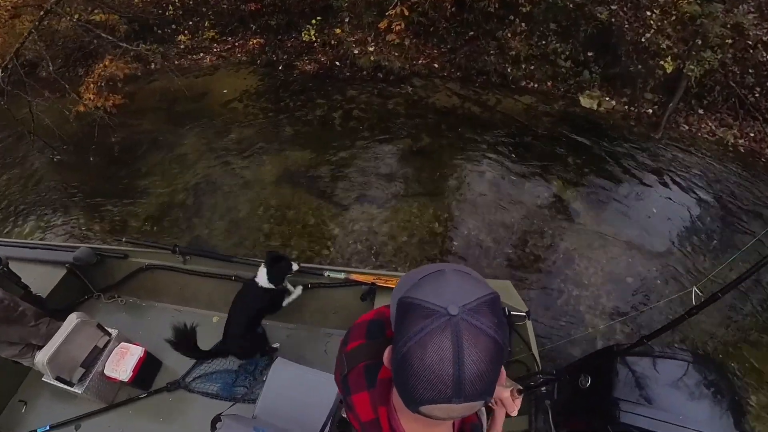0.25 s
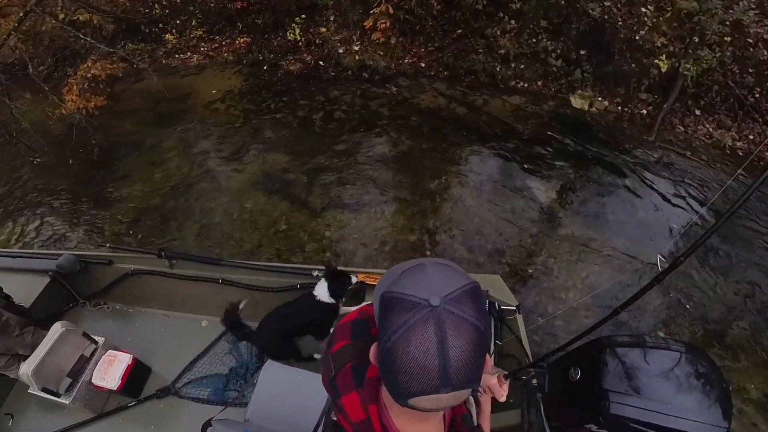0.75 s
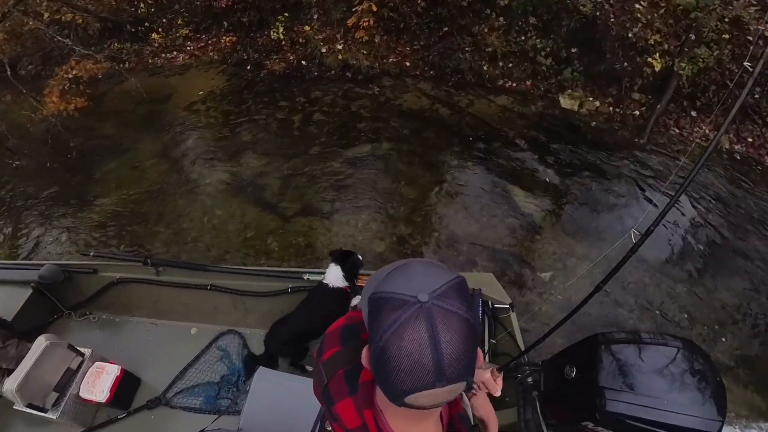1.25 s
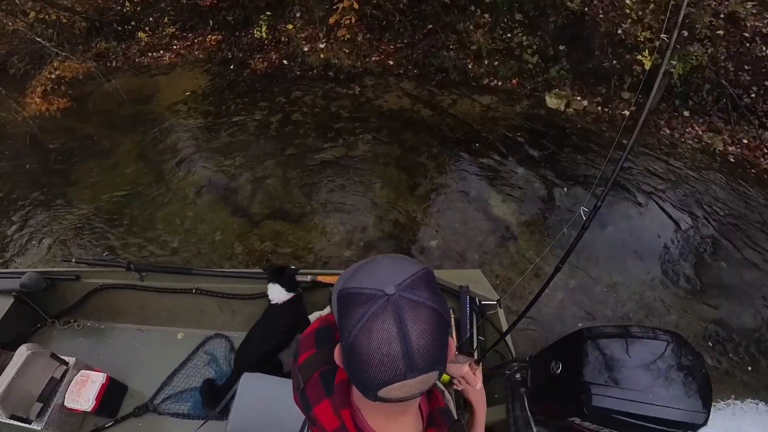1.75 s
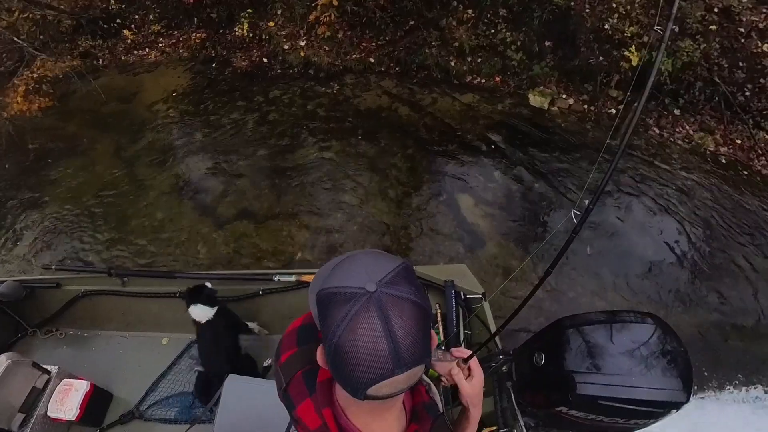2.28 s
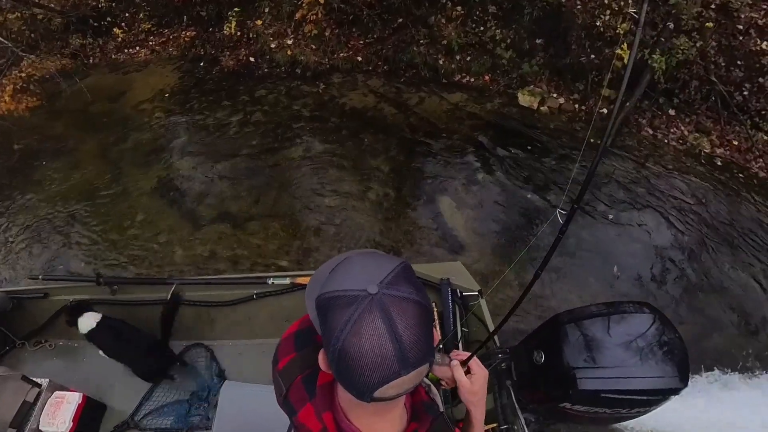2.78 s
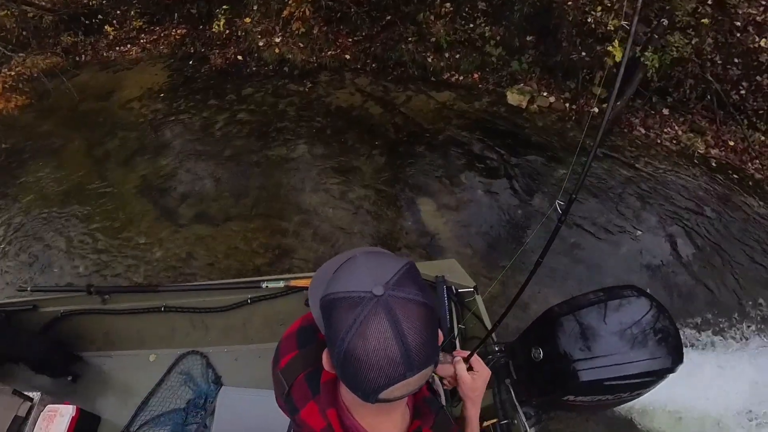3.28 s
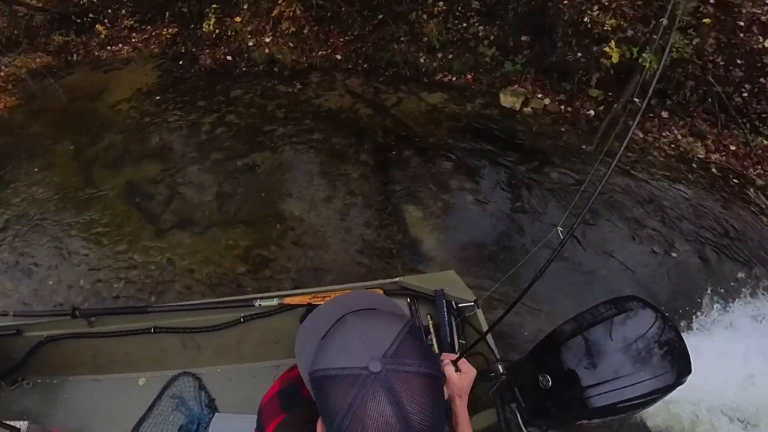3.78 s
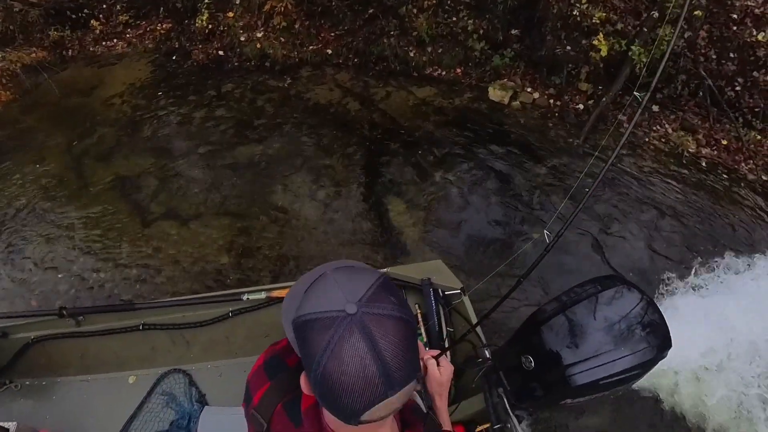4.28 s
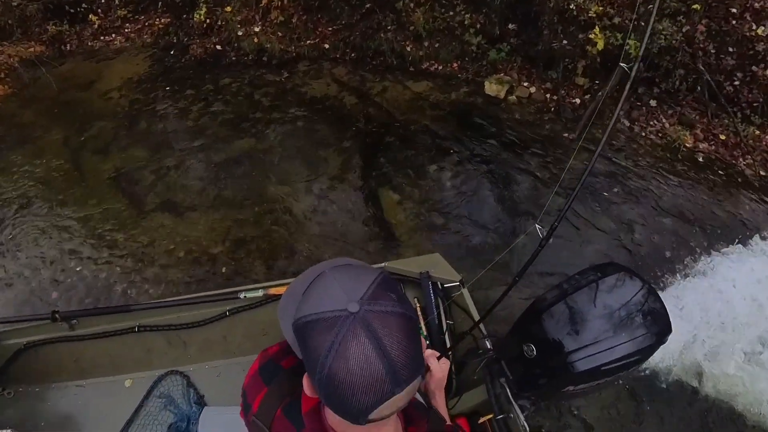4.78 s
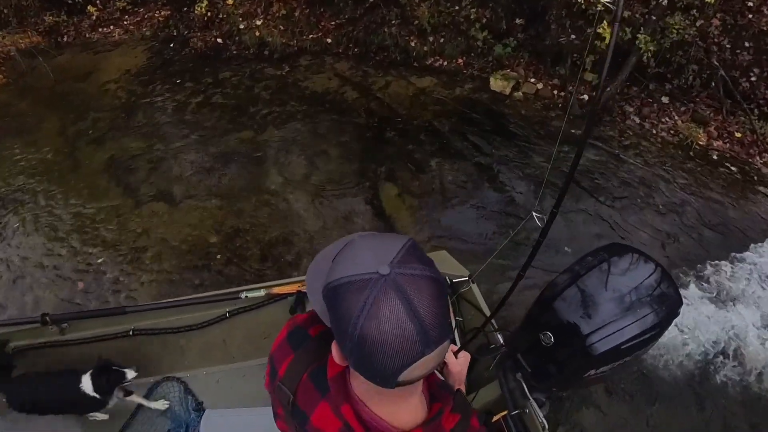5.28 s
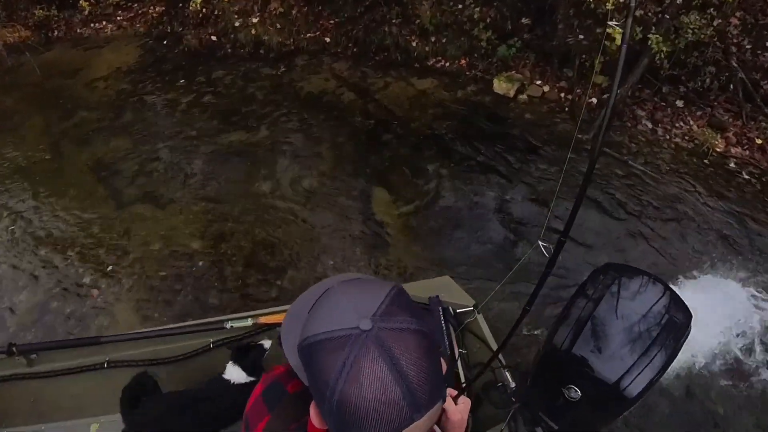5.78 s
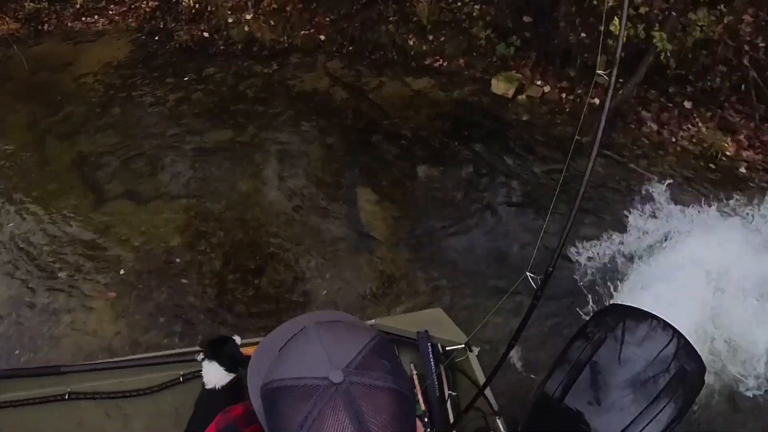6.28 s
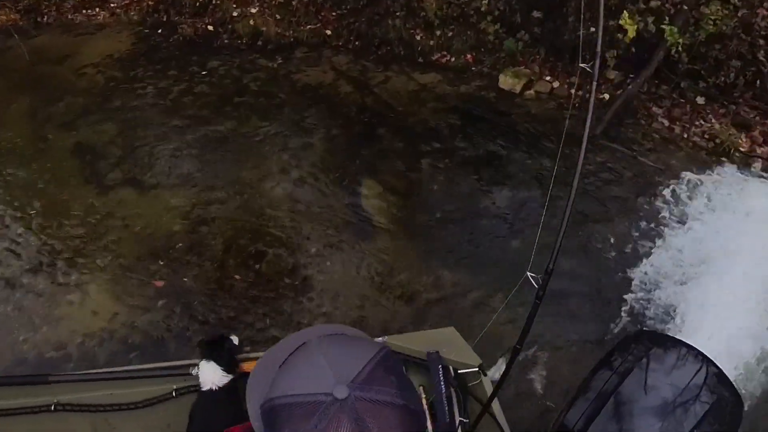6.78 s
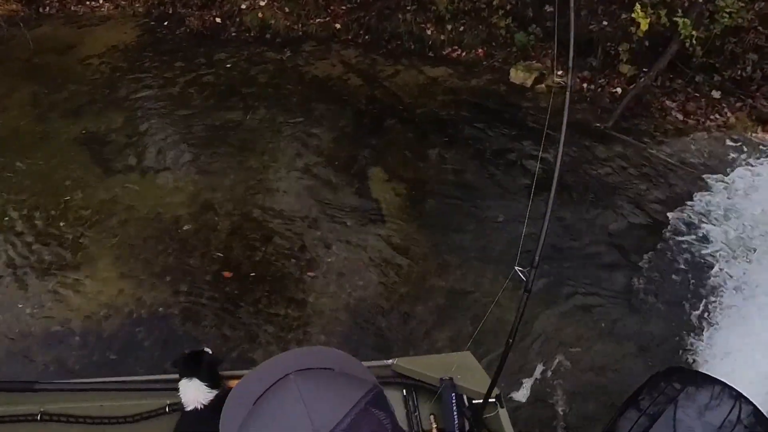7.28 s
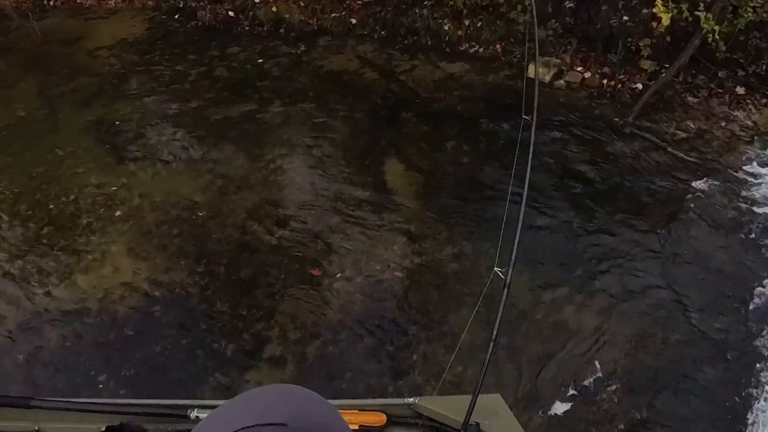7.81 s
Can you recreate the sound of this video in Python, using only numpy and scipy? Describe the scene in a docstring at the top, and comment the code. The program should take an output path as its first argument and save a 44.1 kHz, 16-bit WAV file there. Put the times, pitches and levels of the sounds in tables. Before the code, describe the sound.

An outboard motor dominates, deep and boomy, heard outdoors from aboard with no obvious echo. It idles with separate soft thumps, revs up and holds, falls abruptly to a burble with a swell of splashing wash, then quickly revs higher and stays there, buzzing. Underneath run bubbling exhaust water, fine airy spray spread left and right, and occasional light drop slaps.

```python
"""An outboard jet motor pushes a flat boat along a river, the throttle opened, closed and opened again.
Each firing is an impulse that excites resonances of the wet exhaust and, fainter, of the leg and cowling.
Exhaust gas churns the water and the jet throws hissing spray behind the stern: both are coloured noise.
Single drops slap the hull as short decaying noise bursts."""
import sys
import numpy as np
from scipy import signal
from scipy.fft import rfft, irfft
from scipy.io import wavfile
from scipy.ndimage import uniform_filter1d

SR = 44100
rng = np.random.default_rng(int(sys.argv[2]) if len(sys.argv) > 2 else 0)


def materialize(psi):
    """Save the field psi as 16-bit PCM at rate SR to the path in sys.argv[1].

    A 1-D psi becomes a single channel; in a 2-D psi each row is a channel.
    """
    bounded = np.clip(np.atleast_2d(psi).T, -1, 1)
    quanta = np.round(bounded * 32767).astype(np.int16)
    wavfile.write(sys.argv[1], SR, quanta)


N = 355005

# Firing rate of the engine: t/s, firings per second/Hz
FIRING_RATE = [(0.0, 24.61), (0.08, 23.94), (0.6, 27.66), (0.82, 33.28), (1.27, 37.63), (1.68, 51.28),
               (1.94, 55.28), (2.34, 57.67), (2.68, 56.46), (3.11, 58.84), (3.49, 56.81), (4.41, 56.39),
               (4.48, 43.64), (4.71, 29.15), (5.01, 24.81), (5.39, 24.2), (5.58, 35.5), (5.71, 52.57),
               (5.83, 62.18), (6.18, 71.96), (6.59, 67.33), (7.3, 63.68), (7.74, 64.44), (8.05, 62.99)]
# Four cylinders in firing order, at full inequality: extra strength/1, lateness/firing intervals
CYLINDERS = [(0.41, -0.026), (-0.91, 0.049), (-0.39, -0.058), (0.13, -0.056)]
# How unequally the cylinders fire: t/s, share in the exhaust/1, share in the cowling/1
INEQUALITY = [(0, .16, .3), (1.5, .06, .35), (4.4, .06, .4), (4.8, .16, .3), (5.8, .1, .3), (6.3, .14, .4),
              (8.05, .15, .4)]
# Exhaust resonances: f/Hz, width/Hz, relative level/dB
EXHAUST_MODES = [(44, 190, -16), (113.5, 28.3, 11), (152, 30, -12.5)]
# Cowling resonances: f/Hz, width/Hz, relative level/dB
COWLING_MODES = [(215, 40, -6), (272, 26, 0), (392, 24, -4)]
# Exhaust thump before its dips: t/s, level/dB
THUMP_LEVEL = [(0, -21.5), (.72, -22), (.8, -20.5), (4.36, -21.5), (4.43, -29.5), (4.6, -22.5),
               (4.66, -21.5), (5.4, -23), (5.45, -20), (5.7, -20), (6.1, -23), (6.3, -23.5), (8.05, -22.5)]
# Brief dips of the thump: t/s, depth/dB
THUMP_DIPS = [(4.59, 10), (4.78, 2.5), (6.14, 1), (6.34, 1), (7.38, 10)]
# Cowling ring, strong only with the throttle open: t/s, level/dB
RING_LEVEL = [(0, -43), (1.2, -42), (1.5, -32), (4.38, -31.5), (4.5, -45), (5.5, -44), (5.95, -31),
              (6.45, -26), (8.05, -27)]
# Water churned by the exhaust: t/s, level/dB
CHURN_LEVEL = [(0, -33.5), (1.2, -34.5), (1.5, -31.5), (2, -34.5), (4.3, -34), (4.75, -30.5), (5.25, -32.5),
               (5.75, -29.5), (8.05, -29.5)]
# Spectrum of the churned water: f/Hz, relative level per Hz/dB
CHURN_SPECTRUM = [(15, -19), (40, -22), (86, -8.5), (125, 4.5), (170, -4.5), (205, -2), (270, 0.5),
                  (340, -0.5), (400, -1.5), (490, -4.5), (560, -11.5), (760, -20), (1000, -22), (1300, -33)]
# Moving water: t/s, mean wash level/dB, reference spray level/dB
WATER_LEVEL = [(0, -37, -42), (.3, -43.5, -45), (.56, -40.5, -45.5), (.72, -40, -43), (1.0, -42.5, -46.5),
               (1.32, -43, -44.5), (1.8, -47.5, -48.5), (3.3, -45.5, -47.5), (4.25, -46, -50),
               (4.46, -45, -45.5), (4.6, -36.5, -41), (4.85, -40, -41.5), (5.27, -42.5, -45.5),
               (5.9, -48, -53.5), (6.12, -45.5, -52.5), (6.39, -40, -45.5), (6.7, -41, -49),
               (7.3, -40, -47.5), (7.85, -34, -44), (8.05, -36.5, -46.5)]
# Spectrum of the wash: f/Hz, relative level per Hz/dB
WASH_SPECTRUM = [(350, -24), (600, 1), (753, -3), (1430, -8.5), (1550, -15.5), (1910, -16), (2600, -23),
                 (3380, -27), (5720, -120)]
# Spectrum of the spray: f/Hz, relative level per Hz/dB
SPRAY_SPECTRUM = [(1120, -9), (1900, 0), (3210, -4), (4030, -2.5), (4940, -5.5), (10500, -8.5),
                  (13100, -20), (14300, -28)]
# Mean level of a narrow hiss near 4 kHz: t/s, level against the spray/dB
AIRY_LEVEL = [(0, -19), (1.2, -13.5), (3.5, -21), (4.4, -15), (5.5, -25), (8.05, -12)]
# Colour of the stereo difference, added to the spray spectrum: f/Hz, relative level/dB
SIDE_COLOUR = [(2800, -60), (3100, -4), (5000, -3), (7400, -3), (8200, -8), (10500, -9), (12800, -6),
               (13300, -30)]
# Drops on the hull: t/s, relative level/dB, f/Hz
HULL_DROPS = [(0.061, -39, 1080), (0.309, -38, 732), (0.679, -37, 1190), (0.866, -34, 703),
              (0.895, -39, 703), (4.609, -46, 869), (4.997, -39, 711), (5.037, -44, 708), (5.117, -45, 721),
              (5.208, -41, 719), (5.272, -34, 746), (7.387, -40, 1130), (7.846, -37, 1170)]

FIRST_FIRING = 0.599   # share of a firing interval gone at the start
RING_LAG_S, PUFF_LAG_S = 0.0029, 0.004   # delays against the firing count
DIP_S = 0.03   # from the middle of a dip to 1/e of its depth in dB
WHINE_ORDER = 7   # whine cycles per firing
WHINE_DB, WHINE_FULL_AT_RING_DB = -42.0, -32.0   # mean full level; ring level below which it falls
BOOM_GONE_PER_S, BOOM_FADE_PER_S = 36.5, 13   # firing rate that ends the idle boom; span of its fade
SURGE_DB, SURGES_PER_S = 1.04, 3.1   # random surging of the wash: spread, low-pass corner
CUTOFF_HZ = 14600


def motor(count):
    """Source-filter principle: the firings drive exhaust and cowling as two click trains, each with its own
    unevenness; a whine is locked to their rate."""
    in_exhaust, in_cowling = in_time(INEQUALITY)
    thump = exhaust_thump(firings(count, in_exhaust, jitter=0.004, scatter_db=6.0))
    ring = cowling_ring(firings(count, in_cowling, jitter=0.003, scatter_db=1.5))
    ring_db, = in_time(RING_LEVEL)
    thump = from_db(thump_db()) * evened(thump)
    ring = from_db(ring_db) * evened(later(ring, RING_LAG_S))
    return thump - ring + whine(count, ring_db)


def firings(count, unequal, jitter, scatter_db):
    """Periodic excitation: a click per firing, with cylinder habits and chance; scatter at full inequality."""
    whole = np.arange(1, int(count[-1]))
    share = np.interp(whole, count, unequal)
    extra, late = share * np.array(CYLINDERS)[whole % 4].T
    chance = rng.standard_normal((len(whole), 2))
    due = whole + late + jitter * chance[:, 0]   # in firing intervals
    at = np.interp(due, count, np.arange(N)).astype(int)
    clicks = np.zeros(N)
    clicks[at] = (1 + extra) * from_db(scatter_db * share * chance[:, 1])
    return clicks


def exhaust_thump(clicks):
    """Resonance: each click rings the exhaust modes, with a deeper boom added at low speed."""
    thump = band_pass(resonances(clicks, EXHAUST_MODES), 36, 190, order=2)
    thump = signal.lfilter(*signal.butter(1, 70, fs=SR), thump)   # the water column softens the blow
    idling = np.clip((BOOM_GONE_PER_S - in_time(FIRING_RATE)[0]) / BOOM_FADE_PER_S, 0, 1)
    boom = resonances(thump, [(57.3, 48, 9.5)])   # f/Hz, width/Hz, level/dB
    return thump + idling * boom


def thump_db():
    """Amplitude modulation: the level curve of the thump, lowered by short bell-shaped dips."""
    t = np.arange(N) / SR
    dips = sum(depth_db * np.exp(-((t - s) / DIP_S) ** 2) for s, depth_db in THUMP_DIPS)
    return in_time(THUMP_LEVEL)[0] - dips


def cowling_ring(clicks):
    """Resonance: the clicks excite the cowling modes, confined to a band."""
    ring = resonances(clicks, COWLING_MODES, turn=1)
    return band_pass(ring, 175, 310, order=3)


def whine(count, ring_db):
    """Harmonic locking: a sine at a multiple of the firing rate, weakening with a faint cowling ring."""
    tone = np.sqrt(2) * np.sin(2 * np.pi * WHINE_ORDER * count)
    level_db = WHINE_DB + np.minimum(ring_db - WHINE_FULL_AT_RING_DB, 0) + 0.56 * drift(4.0)
    return from_db(level_db) * tone


def gas_puffs(count, per_s):
    """Periodic modulation: gas bursts into the water once a firing; bursts merge as the engine speeds up."""
    cycle = np.cos(2 * np.pi * (later(count, PUFF_LAG_S) - 0.15))
    return cycle * per_s[0] / per_s


def churn(puff):
    """Turbulence noise: water churned by exhaust gas, modulated by the puffs."""
    water = rush(CHURN_SPECTRUM, patchy_db=0.26, flicker_per_s=13)
    return from_db(in_time(CHURN_LEVEL)[0]) * (1 + 0.13 * puff) * water


def wash(puff, wash_db):
    """Turbulence noise: the wash surges at random and pulses with the puffs."""
    water = rush(WASH_SPECTRUM, patchy_db=1.14, flicker_per_s=18)
    return from_db(wash_db + SURGE_DB * drift(SURGES_PER_S)) * (1 + 0.22 * puff) * water


def spray(puff, spray_db):
    """Superposition: puff-modulated broad and narrow noise join the ringing of many small drops."""
    narrow = rms_one(resonances(rng.standard_normal(N), [(3920, 340, 0)]))
    airy = from_db(in_time(AIRY_LEVEL)[0] + 5.2 * drift(8.0)) * narrow
    broad = rush(SPRAY_SPECTRUM, patchy_db=2.15, flicker_per_s=33)
    hiss = (1 + 0.082 * puff) * (broad + airy) + from_db(-8) * droplets(per_s=260.0)
    return from_db(spray_db - 1.5) * hiss


def droplets(per_s):
    """Shot noise: random clicks of uneven size and either sign ring briefly as small drops."""
    size_db = 3.6 * np.minimum(rng.exponential(1, N), 4)
    struck = rng.random(N) < per_s / SR
    clicks = struck * from_db(size_db) * rng.choice([-1, 1], N)
    return rms_one(resonances(clicks, [(1520, 1200, 6.0), (4130, 1100, -5), (7000, 6000, -16)]))


def spray_side(spray_db):
    """Decorrelation: independent treble noise, opposite in the two channels, widens the spray."""
    colour = [(hz, at_hz(SPRAY_SPECTRUM, hz) + db) for hz, db in SIDE_COLOUR]
    return from_db(spray_db - 8.5) * rush(colour, patchy_db=3.5, flicker_per_s=15)


def slaps():
    """Impact and decay: each drop on the hull is a short noise burst round its own pitch."""
    out, t = np.zeros(N + SR), np.arange(int(0.033 * SR)) / SR
    bursts = rng.standard_normal((len(HULL_DROPS), len(t)))
    for (s, level_db, hz), burst in zip(HULL_DROPS, bursts):
        sound = rms_one(resonances(burst, [(hz, hz, 0), (4000, 3000, -13)]))
        start = round(s * SR)
        out[start:][:len(t)] += from_db(level_db + 1) * sound * np.exp(-t / 0.0097)
    return signal.sosfilt(signal.butter(3, 7500, fs=SR, output="sos"), out[:N])


def rush(spectrum, patchy_db, flicker_per_s):
    """Filtered noise of rms 1: third-octave bands swell partly together, partly alone."""
    hz = np.maximum(np.fft.rfftfreq(N, 1 / SR), 1)
    low, high = spectrum[0][0], spectrum[-1][0]
    gain = from_db(at_hz(spectrum, hz)) * (hz > low) * (hz < high)
    colour = gain * rfft(rng.standard_normal(N))
    out, together = 0, drift(flicker_per_s)
    place = 3 * np.log2(hz / low)   # in third octaves
    for k in range(int(place[hz < high][-1]) + 2):
        overlap = np.cos(np.pi / 2 * np.clip(place - k, -1, 1)) ** 2   # neighbours sum to one
        band = irfft(colour * overlap, N)
        out = out + band * from_db(patchy_db * (0.26 * together + drift(flicker_per_s)))
    return rms_one(out)


def resonances(x, modes, turn=-1):
    """Parallel resonators: turn -1 alternates their signs, turn 1 leaves a notch between neighbours."""
    out = 0
    for k, (hz, width_hz, level_db) in enumerate(modes):
        r = np.exp(-np.pi * width_hz / SR)   # a wider mode decays faster
        zeros = (1 - r * r) / 2 * np.array([1, 0, -1])
        poles = [1, -2 * r * np.cos(2 * np.pi * hz / SR), r * r]
        out = out + turn ** k * from_db(level_db) * signal.lfilter(zeros, poles, x + 1e-18)
    return out


def band_pass(x, low_hz, high_hz, order):
    """Band limitation: a Butterworth filter passes the range between two corners."""
    return signal.sosfilt(signal.butter(order, [low_hz, high_hz], "band", fs=SR, output="sos"), x)


def drift(rate):
    """Slow random fluctuation of spread 1: noise through two one-pole low-passes with corner rate/Hz."""
    r = np.exp(-80 * np.pi * rate / SR)   # computed on every 40th sample
    noise = rng.standard_normal(N // 40 + 2002)
    slow = signal.lfilter([1], [1, -2 * r, r * r], noise)[2000:]
    return np.interp(np.arange(N) / 40, np.arange(len(slow)), rms_one(slow))


def evened(x):
    """Level normalisation: running rms is held near 1, so that a curve alone sets the level."""
    size = int(0.16 * SR)
    power = uniform_filter1d(uniform_filter1d(x ** 2, size), size)
    return x / np.sqrt(power + 1e-20)


def later(x, seconds):
    """Propagation delay by interpolation."""
    return np.interp(np.arange(N) - seconds * SR, np.arange(N), x)


def in_time(rows):
    """Linear interpolation: the columns of a time table, one value a sample."""
    s, *columns = np.transpose(rows)
    return [np.interp(np.arange(N) / SR, s, c) for c in columns]


def at_hz(points, hz):
    """Spectral interpolation on a log-frequency axis."""
    table_hz, level_db = np.array(points).T
    return np.interp(np.log(hz), np.log(table_hz), level_db)


def from_db(db):
    """Logarithmic level: decibels to amplitude gain."""
    return 10 ** (np.asarray(db) / 20)


def rms_one(x):
    """Power normalisation: scale to rms 1."""
    return x / np.sqrt(np.mean(x ** 2) + 1e-20)


def scene():
    """Superposition: motor, water and drops in the middle, with spray spread between left and right."""
    per_s = in_time(FIRING_RATE)[0]
    count = FIRST_FIRING + np.cumsum(per_s) / SR   # firings so far
    wash_db, spray_db = in_time(WATER_LEVEL)
    puff = gas_puffs(count, per_s)
    mid = motor(count) + churn(puff) + wash(puff, wash_db) + spray(puff, spray_db) + slaps()
    side = spray_side(spray_db)
    return np.array([mid + side, mid - side])


def record(dry):
    """Band limitation: a steep low-pass holds the top at least 38 dB down above the cutoff."""
    return signal.sosfilt(signal.cheby2(16, 38, CUTOFF_HZ, fs=SR, output="sos"), dry)


dry = scene()
out = record(dry)
materialize(out)
```